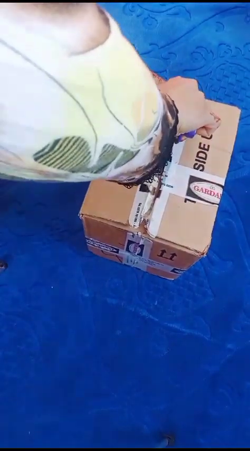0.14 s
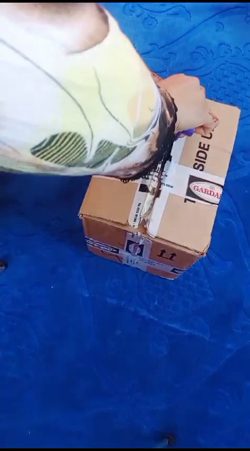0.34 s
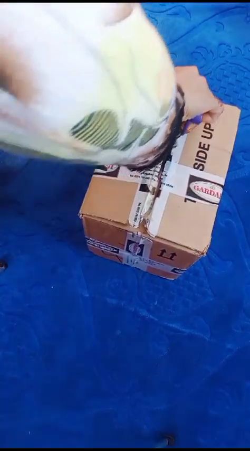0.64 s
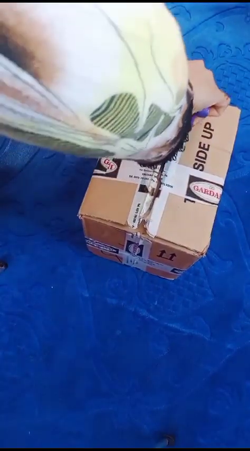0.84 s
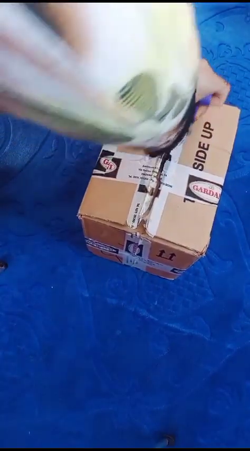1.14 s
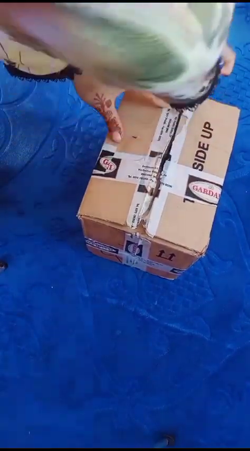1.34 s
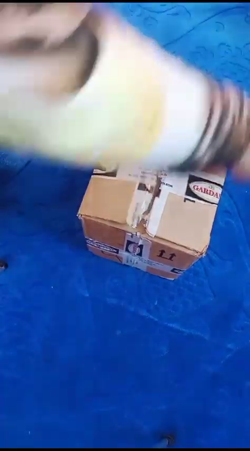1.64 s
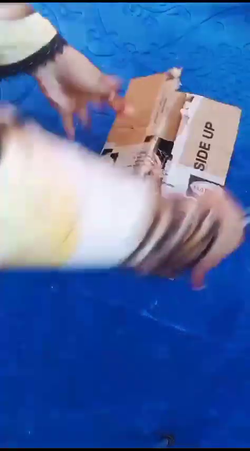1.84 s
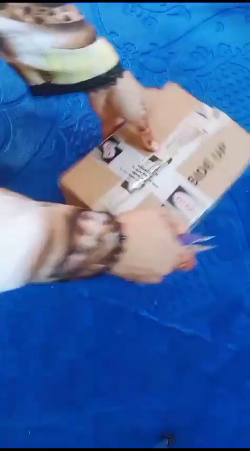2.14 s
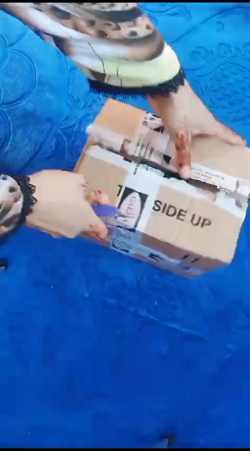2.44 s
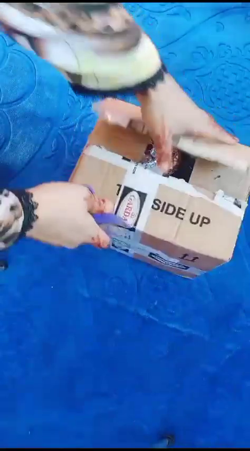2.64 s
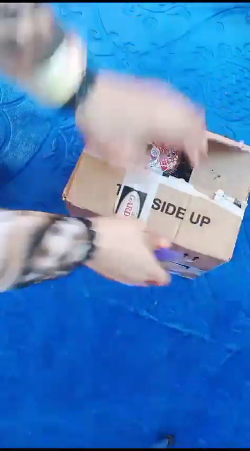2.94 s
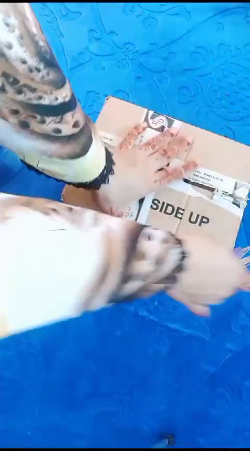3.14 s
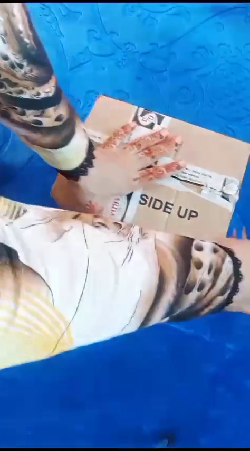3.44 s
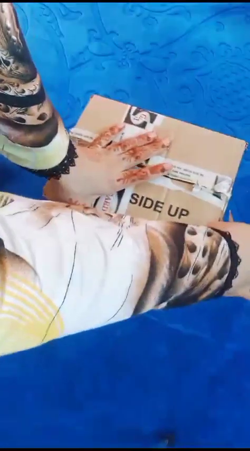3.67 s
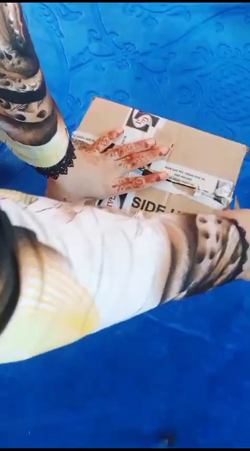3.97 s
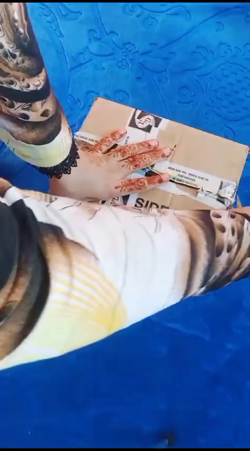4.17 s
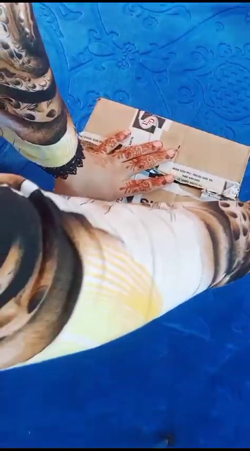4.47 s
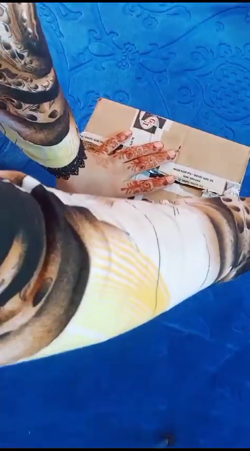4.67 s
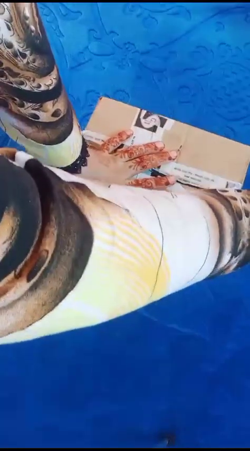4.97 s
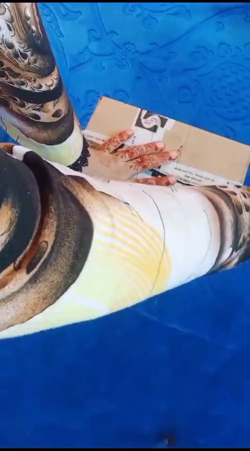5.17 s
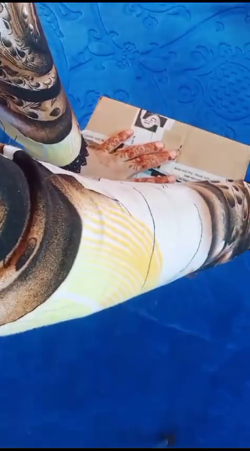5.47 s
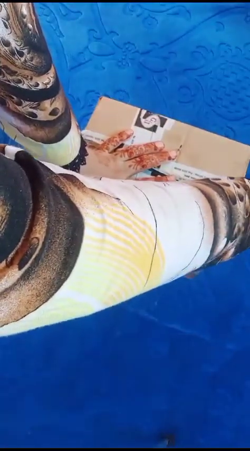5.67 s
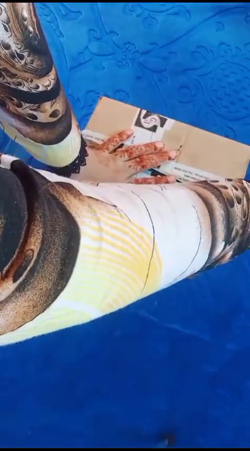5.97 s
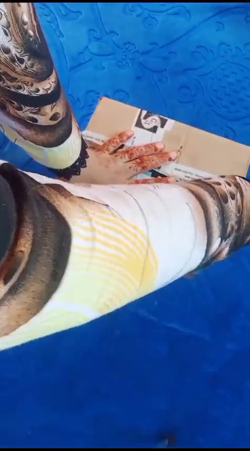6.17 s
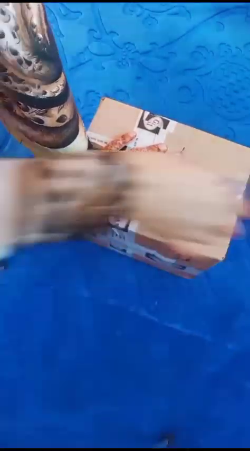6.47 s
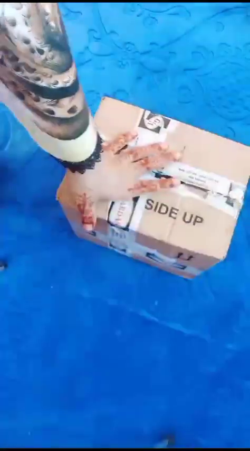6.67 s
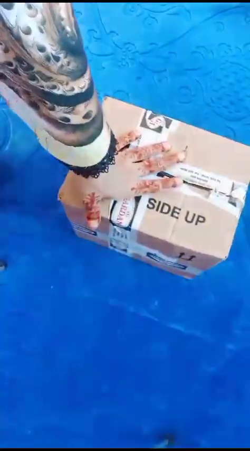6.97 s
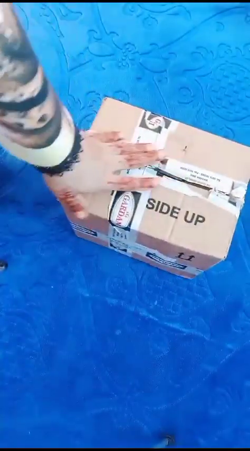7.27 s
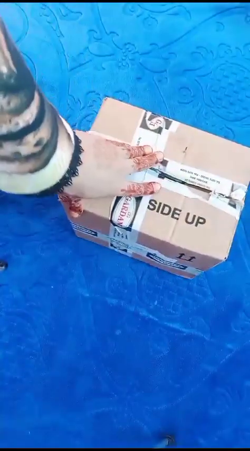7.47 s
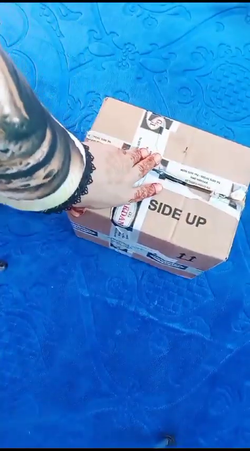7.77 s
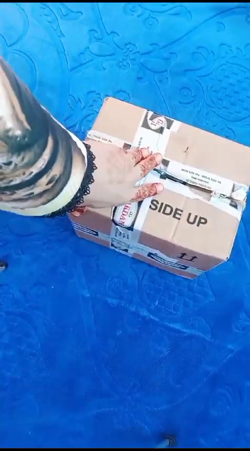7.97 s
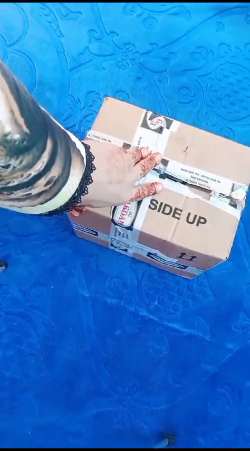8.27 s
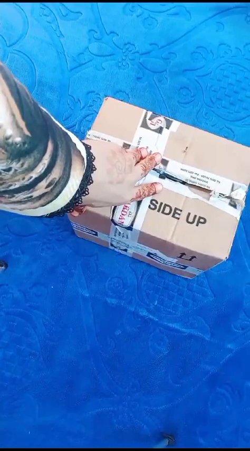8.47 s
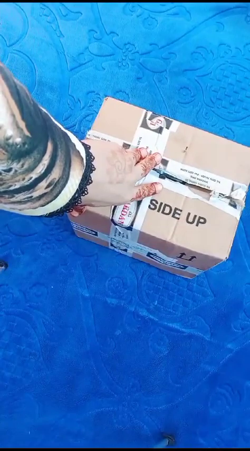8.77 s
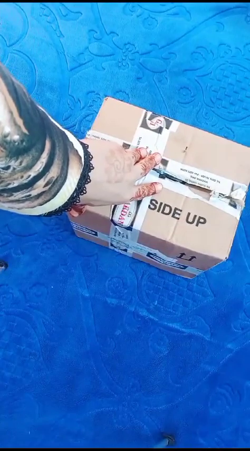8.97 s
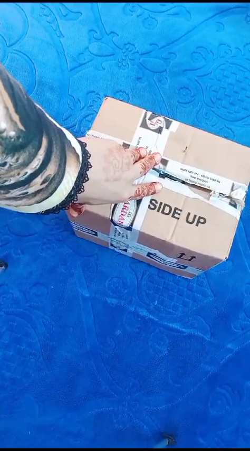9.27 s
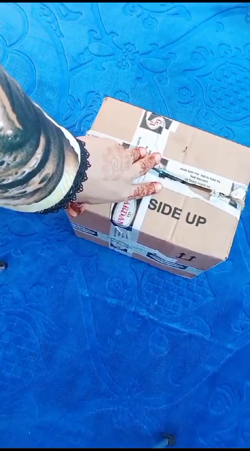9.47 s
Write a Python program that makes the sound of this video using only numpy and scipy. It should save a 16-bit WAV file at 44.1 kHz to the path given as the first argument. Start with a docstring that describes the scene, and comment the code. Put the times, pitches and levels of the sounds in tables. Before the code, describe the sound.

Packing tape snaps and crackles in quick bursts as nails pull at it, and the cardboard box under it knocks and rustles while being moved. The picking turns softer, a loud snap with a thump comes just past the middle, and scattered cracks and light taps finish. It is heard from a phone above the box, in a small room with faint background noise.

```python
"""Packing tape cracks as fingernails pick it off a cardboard box: the glue snaps and a stiff flap rings.
Nail tips tick on the tape. The box is turned, pressed and set down on a mat, so knocks ring its panels
while card and sleeve rub and scrape. Behind this are faint room noise, a brief far hum and one tiny
squeak. It all happens in a small hard room, heard through a phone overhead."""
import sys
import numpy as np
from scipy import signal
from scipy.fft import rfft, irfft, next_fast_len
from scipy.io import wavfile
from scipy.ndimage import uniform_filter1d

SR = 44100
rng = np.random.default_rng(int(sys.argv[2]) if len(sys.argv) > 2 else 0)


def transcribe(signal):
    """Save signal, clipped to [-1, 1], as a 16-bit WAV file at the path in sys.argv[1]."""
    frames = np.atleast_2d(signal).T
    limited = np.clip(frames, -1, 1)
    pcm = np.round(limited * 32767).astype(np.int16)
    wavfile.write(sys.argv[1], SR, pcm)


N = 424241
T = np.arange(N) / SR

# Tone of the room noise: pitch_hz, gain_db
ROOM_NOISE_TONE = [(20, -27.5), (38, -4), (93, 7), (177, -2), (527, -4), (849, -7.5), (2750, -11.5),
                   (3840, -19.5), (6360, -38), (14700, -38.5), (16000, -36.5)]
# How the far hum comes and goes: time_s, level_db
HUM_LEVELS = [(4.4, -95), (4.9, -73), (5.2, -70), (6.1, -58), (6.3, -79)]
# Echo of the room: pitch_hz, fade_s (in all tables, the time to fall by 60 dB)
ROOM_FADES = [(125, 0.51), (250, 0.11), (500, 0.26), (1000, 0.34), (2000, 0.26), (4000, 0.2), (8000, 0.16),
              (14000, 0.12)]
# How the phone colours sound: pitch_hz, gain_db
PHONE_TONE = [(25, -38), (45, -2.5), (75, -4.5), (2000, 1), (3000, 0.5), (4500, 3.5), (5800, 2),
              (7200, 4.5), (9000, -8), (11000, -15.5), (13000, -13), (15300, -6.5), (15750, -38)]
# One thin squeak: start_s, level_db, pitch_hz, decay_ms
SQUEAK = (5.274, -63, 3090, 28)
# Rubbing as the box is handled: time_s, hiss_db, rumble_db
RUB_LEVELS = [(0.0, -45, -37), (0.1, -70.5, -59), (0.248, -53.5, -38.5), (0.43, -83.5, -84),
              (0.5, -65, -51), (0.66, -71.5, -57), (0.95, -57, -56.5), (1.06, -64.5, -56.5),
              (1.119, -82, -61), (1.33, -65.5, -60.5), (1.45, -53, -54.5), (1.52, -66, -59.5),
              (1.62, -57, -54.5), (1.71, -47, -38), (1.95, -46.5, -59), (2.05, -42.5, -38.5),
              (2.36, -50, -53.5), (2.441, -59.5, -60.5), (2.581, -69, -61), (2.729, -73.5, -65.5),
              (2.848, -53.5, -48), (3.1, -69, -65), (3.4, -61.5, -55), (3.5, -65.5, -63.5),
              (3.62, -57.5, -44), (3.8, -69.5, -56), (4.42, -76, -65), (5.711, -80.5, -73),
              (5.82, -62.5, -52), (6.199, -67.5, -65), (6.549, -72, -64.5), (6.65, -56, -51.5),
              (6.91, -55, -52.5), (7.15, -62.5, -54.5), (7.58, -79, -67), (8.198, -94, -90.5),
              (8.899, -80, -71.5), (9.62, -71.5, -59.5)]
# Short scrapes and crumples of card, and the dull pops of the loudest tape cracks: start_s, level_db, pitch_hz,
# length_ms
SCRAPES_AND_POPS = [(0.337, -22.5, 1380, 3.4), (0.4, -38, 1930, 53), (0.669, -35.5, 2050, 95), (0.688, -37, 413, 31),
                    (0.836, -16, 1260, 8.1), (1.042, -41.5, 2130, 33), (1.70, -37, 1480, 82), (2.028, -28, 2500, 30),
                    (2.462, -39.5, 2690, 51), (2.748, -45.5, 2660, 58), (2.825, -33.5, 2340, 37),
                    (3.642, -46.5, 1770, 70), (3.963, -47.5, 2480, 36), (5.76, -19.5, 830, 3.6),
                    (5.752, -30, 2640, 15), (5.957, -35.5, 1950, 33), (8.928, -58, 1490, 105), (9.40, -44, 430, 125)]
# Notes at which the box panels and the air inside ring: pitch_hz, level_db, fade_s
BOX_NOTES = [(79, -5.5, 0.26), (133.8, -1, 0.13), (191.5, -3.5, 0.15), (263.2, 0, 0.12), (342.4, -2, 0.12),
             (389.6, 1, 0.087), (469, -7, 0.08), (702, -2.5, 0.026), (756, 0.5, 0.053), (900, 1, 0.06),
             (1120, -1.5, 0.12), (1230, -8.5, 0.032)]
# Knocks on the box: start_s, level_db, pitch_hz (of the panel that rings most)
KNOCKS = [(0.286, -23, 244), (0.335, -16.5, 233), (0.422, -34, 263), (0.542, -34.5, 258),
          (0.729, -29.5, 446), (0.836, -16.5, 343), (0.839, -30.5, 130), (1.026, -39, 258),
          (1.365, -30.5, 430), (1.537, -38.5, 131), (1.647, -29, 117), (1.819, -27.5, 730),
          (2.026, -24, 364), (2.07, -32.5, 360), (2.121, -30, 370), (2.148, -25, 390), (2.172, -32.5, 392),
          (2.574, -46.5, 646), (2.749, -35.5, 86), (2.799, -33, 142), (2.829, -31, 328),
          (2.846, -18.5, 286), (2.86, -25.5, 346), (2.905, -36, 328), (3.159, -47, 527), (3.275, -43, 333),
          (3.374, -45, 250), (3.618, -38, 690), (3.637, -24, 303), (3.933, -25, 390), (4.096, -46, 434),
          (4.199, -39.5, 244), (4.308, -45, 408), (4.72, -40, 364), (5.751, -29, 784), (5.76, -14.5, 311),
          (5.765, -27, 125), (5.958, -33.5, 370), (5.98, -30, 167), (6.395, -40, 790), (6.832, -35.5, 266),
          (8.948, -46, 269), (9.093, -49.5, 260), (9.195, -48.5, 269), (9.364, -43, 256),
          (9.409, -45.5, 411)]
# Ticks of a nail on the tape: start_s, level_db
NAIL_TICKS = [(0.1143, -38.5), (0.201, -47), (0.2463, -57), (0.628, -45), (0.7726, -41.5), (0.797, -57),
              (0.818, -55), (0.831, -43), (0.94, -55), (0.997, -54), (1.105, -54), (1.1243, -48),
              (1.178, -48), (1.53, -48), (2.347, -34), (3.222, -52), (3.943, -43.5), (4.065, -65),
              (4.097, -52), (4.213, -48), (4.277, -44), (4.4406, -57), (4.583, -55), (5.254, -57.5),
              (5.368, -53.5), (5.7084, -56), (6.575, -48), (7.104, -34), (7.3364, -55), (8.655, -61.5),
              (8.72, -60.5), (8.798, -57.5), (9.163, -53)]
# Notes of the stiff flap under the tape: pitch_hz, level_db, fade_s
FLAP_NOTES = [(1360, -1, 0.013), (1980, -5.5, 0.024), (2270, 4, 0.014), (2830, 5, 0.011), (2991, -1, 0.015),
              (3420, -5, 0.016), (4170, -14.5, .012)]
# Cracks of the tape: start_s, level_db, pitch_hz, treble_db (compared with level_db)
TAPE_CRACKS = [(0.0024, -26, 1850, -40), (0.011, -26, 1950, -16), (0.1863, -49, 3540, -17),
               (0.225, -38, 4030, -4), (0.273, -29.5, 2400, 4), (0.2785, -35, 1910, 3),
               (0.287, -25.5, 1390, 0), (0.327, -39, 2700, -7), (0.3352, -26, 1910, 2.5),
               (0.3383, -13.5, 2620, -2.5), (0.4213, -32, 1390, -10), (0.5396, -32, 2920, -14),
               (0.546, -34.5, 1977, -26), (0.5516, -25, 2100, -5.5), (0.685, -37.5, 2070, -26),
               (0.7105, -35.5, 2227, -24), (0.7174, -40, 4430, 0), (0.6925, -35.5, 2080, -26),
               (0.7225, -41.5, 2200, -28), (0.7303, -29.5, 2030, -30), (0.743, -39, 2170, -25),
               (0.8368, -17.5, 1850, -3), (0.8402, -10.5, 2820, -4), (0.872, -23, 2760, -25),
               (1.0181, -39.5, 1310, -0.5), (1.1576, -32.5, 3550, -3), (1.1684, -46, 3240, 13.5),
               (1.2549, -23, 2800, 4), (1.2745, -28, 3050, -27), (1.3596, -32.5, 2000, -8),
               (1.3691, -23.5, 2320, -11.5), (1.766, -38, 4550, -9), (1.8218, -23, 1410, -31),
               (2.0053, -34, 2920, 5), (2.0261, -23.5, 3000, 4), (2.3406, -29, 1820, 13),
               (2.957, -41.5, 4200, 0.5), (3.04, -51, 2410, 0.5), (3.159, -43, 1410, -21),
               (3.275, -46, 2600, -22), (3.4175, -44.5, 1390, 5.5), (3.5713, -45, 1620, -2),
               (3.638, -39, 2800, -13), (3.687, -38, 2970, -1.5), (3.712, -44, 2300, -8),
               (3.7723, -39.5, 1450, 0.5), (3.935, -51, 1920, 4), (4.2016, -42.5, 2550, -3),
               (4.3693, -47.5, 2290, -6), (4.3978, -49, 2990, -4), (4.495, -49, 1980, -10),
               (4.7215, -34.5, 3810, -0.5), (5.129, -48.5, 2410, -2.5), (5.435, -45.5, 5600, 14),
               (5.66, -47.5, 2300, -1), (5.7502, -31.5, 2290, 3), (5.7625, -14.5, 2520, -9),
               (5.774, -28, 3050, -21), (5.803, -31, 3120, -7.5), (6.0398, -25.5, 2700, 1),
               (6.063, -28, 3220, 0), (6.3938, -42.5, 3200, 7.5), (6.6547, -41.5, 1600, 8.5),
               (6.703, -46, 2370, 6.5), (6.757, -27, 1740, -9), (6.91, -44, 1730, 4.5),
               (6.857, -41.5, 1800, -16), (7.04, -48.5, 3470, -6), (7.0917, -41, 2330, -5),
               (7.2332, -35, 2260, 2), (7.244, -40.5, 1400, 4.5), (7.3233, -44, 2580, -1.5),
               (7.5325, -46.5, 1670, 2), (8.953, -51, 1620, -25), (9.0995, -50, 1720, -19),
               (9.192, -52, 1740, -26), (9.2238, -45.5, 2060, -23.5), (9.369, -47.5, 1580, -8),
               (9.4719, -35, 2160, -12.5), (9.507, -46.5, 2180, -17)]


def gain(db):
    """Turn decibels into a number to multiply by."""
    return 10 ** (np.asarray(db) / 20)


def unit(x):
    """Scale a sound to an average (rms) level of 1."""
    return x / np.sqrt(np.mean(x ** 2))


def band(x, low_hz, high_hz):
    """Keep the sound between two pitches."""
    edges = [low_hz, min(high_hz, .45 * SR)]
    return signal.sosfilt(signal.butter(2, edges, "bandpass", fs=SR, output="sos"), x)


def colour(x, tone):
    """Turn each pitch up or down by a tone table."""
    size = next_fast_len(len(x))
    hz, db = np.transpose(tone)
    all_hz = np.arange(size // 2 + 1) * SR / size
    curve = gain(np.interp(np.log(all_hz + 1), np.log(hz), db))
    return irfft(rfft(x, size) * curve, size)[:len(x)]


def wander(rate_hz):
    """Glide to a new random value rate_hz times a second."""
    step = int(SR / rate_hz)
    return uniform_filter1d(np.repeat(rng.standard_normal(N // step + 1), step), step)[:N]


def fade(t, fade_s):
    """Fall by 60 dB every fade_s seconds."""
    return np.exp(-np.log(1000) * t / fade_s)


def add(out, start_s, sound, peak_db):
    """Mix a sound in at start_s with its peak at peak_db."""
    i = max(int(start_s * SR), 0)
    out[i:i + len(sound)] += (sound * gain(peak_db) / np.abs(sound).max())[:N - i]


def room_noise(level_db=-68):
    """Faint, low noise that swells a little."""
    return unit(colour(rng.standard_normal(N), ROOM_NOISE_TONE)) * gain(level_db + wander(0.96))


def far_hum(pitch_hz=149.6):
    """A wavering, fluttering hum that comes and goes."""
    wavering_hz = pitch_hz * (1 + 0.045 * wander(4.0))
    level_db = np.interp(T, *np.transpose(HUM_LEVELS)) + 6.5 * wander(44)
    return np.sin(2 * np.pi * np.cumsum(wavering_hz) / SR) * gain(level_db)


def room_echo(x, level_db=-6.5, nearest_wall_s=0.0055):
    """Echoes build up from the nearest wall, then each range of pitch fades at its own speed."""
    t = T[:int(.5 * SR)]
    tail = sum(band(rng.standard_normal(len(t)), hz / 1.46, hz * 1.48) * fade(t, fade_s) / np.sqrt(fade_s)
               for hz, fade_s in ROOM_FADES)
    tail *= np.clip(t / nearest_wall_s, 0, 1) ** 2
    tail /= np.sqrt(np.sum(tail ** 2))
    return gain(level_db) * signal.fftconvolve(x, tail)[:N]


def squeak():
    """A faint thin tone that starts quickly and fades."""
    start_s, db, hz, decay_ms = SQUEAK
    out, t = np.zeros(N), T[:6000]
    swell = (1 - np.exp(-t / .005)) * np.exp(-t / (decay_ms / 1000))
    add(out, start_s, swell * np.sin(2 * np.pi * hz * t), db)
    return out


def rubbing(slips_per_s=220, fast_rub_db=-56.5):
    """Card and sleeve rub: a grainy hiss with stray slips, and a rumble from the big box panels."""
    times, *levels = np.transpose(RUB_LEVELS)
    hiss_db, rumble_db = (np.interp(T, times, level) for level in levels)
    speed_db = hiss_db - fast_rub_db
    grit = rng.standard_normal(N) * gain(2.2 * wander(70) + 1.4 * wander(14))
    slips = (rng.random(N) < slips_per_s / SR) * rng.standard_normal(N)
    slips *= gain(7.6 * np.minimum(rng.exponential(size=N), 1.5))  # some are much bigger
    slips *= gain(-np.maximum(speed_db, 0))  # a fast rub drowns them
    jolts = rng.standard_normal(N) * gain(2.2 * wander(35))
    rumble = sum(gain(db) * unit(band(jolts, hz - 3.56 / fade_s, hz + 3.4 / fade_s))
                 for hz, db, fade_s in BOX_NOTES[:8])
    hiss = unit(band(grit + 2.5 * slips, 560, 4030))
    treble = unit(band(grit + 4.1 * slips, 3000, 16000))
    treble *= gain(-3 + .1 * speed_db)  # a faster rub is brighter
    return gain(hiss_db) * (hiss + treble) + gain(rumble_db) * unit(rumble)


def scrapes_and_pops():
    """Card fibres catch and slip in a quick, grainy swell; the shortest rows give the dull pop of the loudest
    tape cracks."""
    out, t = np.zeros(N), T[:6000]
    for start_s, db, hz, length_ms in SCRAPES_AND_POPS:
        progress = np.minimum(t / (length_ms / 1000), 1)
        grain = rng.standard_normal(len(t)) * gain(4 * rng.standard_normal(len(t) // 100).repeat(100))
        swell = grain * np.sin(np.pi * progress ** 0.84)
        edges = hz / 1.55, hz * 1.4
        body = unit(band(band(swell, *edges), *edges))
        add(out, start_s, body + 0.13 * unit(band(swell, hz, 17000)), db)
    return out


def box_knocks(focus_db_per_octave=23, push_cycles=0.8, thump_s=0.011):
    """A soft push rings the box, most of all the panel nearest the blow; loose flaps rattle after it."""
    out, t = np.zeros(N), T[:12000]
    hz, note_db, fade_s = np.transpose(BOX_NOTES)[:, :, None]
    for start_s, db, panel_hz in KNOCKS:
        louder, sharper, flip = rng.standard_normal((len(hz), 3)).T[:, :, None]
        near_db = -focus_db_per_octave * np.abs(np.log2(hz / panel_hz)) + 2.0 * louder
        notes = np.sign(flip) * np.sin(2 * np.pi * hz * (1 + 0.0065 * sharper) * t) * fade(t, fade_s)
        ring = unit((gain(note_db + near_db) * notes).sum(axis=0))
        noise = band(rng.standard_normal(len(t)), panel_hz / 2.2, panel_hz * 1.79)
        rattle = unit(noise * np.exp(-t / 0.02))
        rise = (1 - np.exp(-t * panel_hz / push_cycles)) ** 2
        thump = 1 + np.exp(-t / thump_s)  # the first swing stands out, then the hand damps the panel
        add(out, start_s, rise * thump * (ring + 0.36 * rattle), db)
    return out


def nail_ticks():
    """A nail tip slips over one ridge of the tape: a single bright click."""
    out, t = np.zeros(N), T[:256]
    for start_s, db in NAIL_TICKS:
        click = rng.standard_normal(len(t)) * np.exp(-t / .0004)
        add(out, start_s, band(click, rng.uniform(2500, 5000), 16000), db)
    return out


def tape_cracks(spots=6, typical_tear_s=0.0015, focus_db_per_octave=25):
    """Glue lets go with a snap and a rush of tiny slips that ring the flap. One track per tape spot."""
    out, t = np.zeros((spots, N)), T[:2048]
    note_hz, note_db, fade_s = np.transpose(FLAP_NOTES)[:, :, None]
    for k, (start_s, db, hz, treble_db) in enumerate(TAPE_CRACKS):
        # louder cracks tend to tear for longer
        tear_s = typical_tear_s * gain(0.15 * (db + 25.5) + 8.5 * rng.standard_normal())
        rush = (1 - np.exp(-t / (0.21 * tear_s))) * np.exp(-t / tear_s)
        slips = rng.standard_normal((2, len(t))) * rush
        slips[:, 4] += 1.5  # the first snap
        body_slips, treble_slips = slips
        bend = 1 + .02 * rng.standard_normal(note_hz.shape)  # the flap is held differently each time
        notes = np.sin(2 * np.pi * note_hz * bend * t) * fade(t, fade_s)
        near_db = -focus_db_per_octave * np.abs(np.log2(note_hz / hz))
        flap = (gain(note_db + near_db) * notes).sum(axis=0)
        ring = unit(signal.fftconvolve(body_slips, flap)[:len(t)])
        edges = hz / 2.1, hz * 1.4
        snap = unit(band(band(body_slips, *edges), *edges))
        snap *= np.clip((treble_db - db + 6) / 38, .3, 1.2)  # faint, bright cracks snap more than ring
        treble = band(treble_slips, 4800, 20000) + 0.86 * band(treble_slips, 13100, 15600)
        add(out[k % spots], start_s, ring + snap, db)
        add(out[k % spots], start_s, treble, db + treble_db)
    return out


def scene():
    """Each part of the box gets its own echo; the phone colours the mix, and the background is added."""
    parts = *tape_cracks(), nail_ticks() + scrapes_and_pops(), box_knocks(), rubbing()
    in_room = sum(part + room_echo(part) for part in parts)
    foreground = colour(in_room + squeak(), PHONE_TONE)
    return (foreground + room_noise() + far_hum())[None]


def record(dry):
    """The phone drops the deepest bass, rounds the loudest peaks and cuts the highest treble."""
    bass_cut = signal.butter(2, 45, "highpass", fs=SR, output="sos")
    treble_cut = signal.ellip(10, .2, 70, 16700, fs=SR, output="sos")
    rounded = np.tanh(1.713 * signal.sosfilt(bass_cut, dry)) / 1.888
    return signal.sosfilt(treble_cut, rounded)


dry = scene()
out = record(dry)
transcribe(out)
```